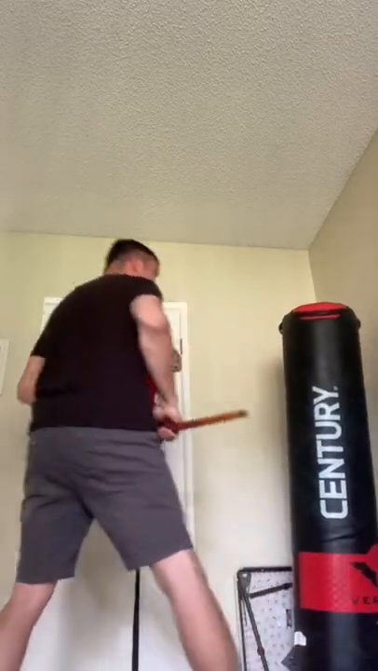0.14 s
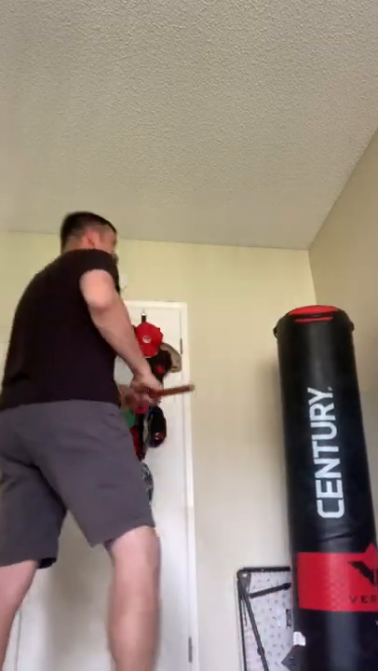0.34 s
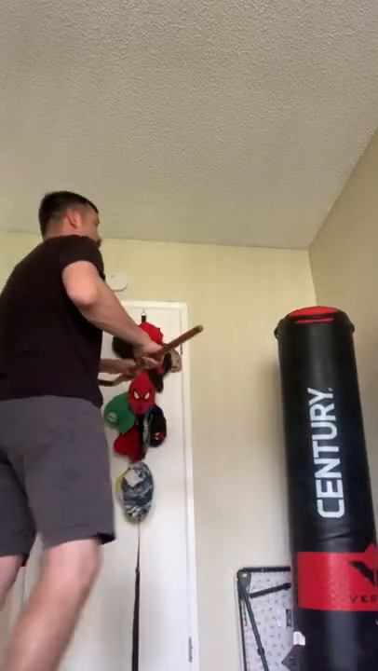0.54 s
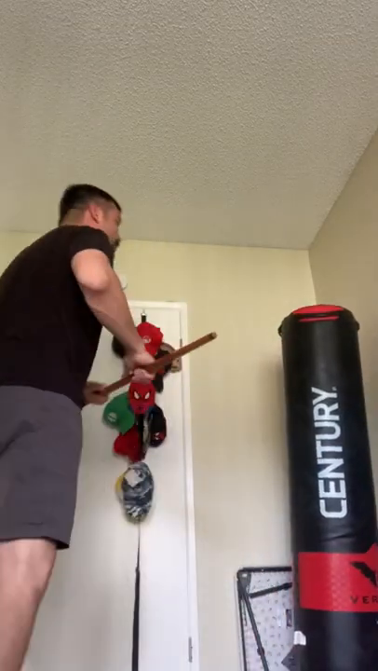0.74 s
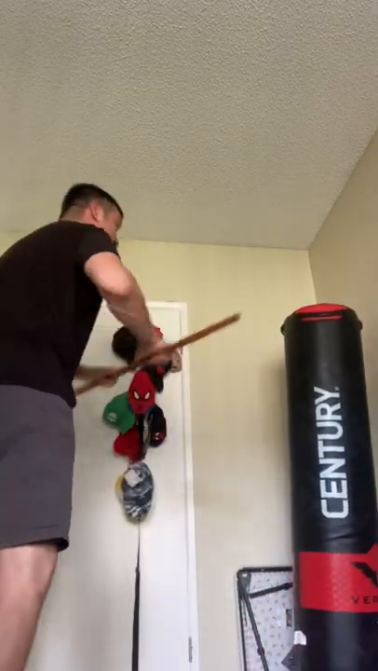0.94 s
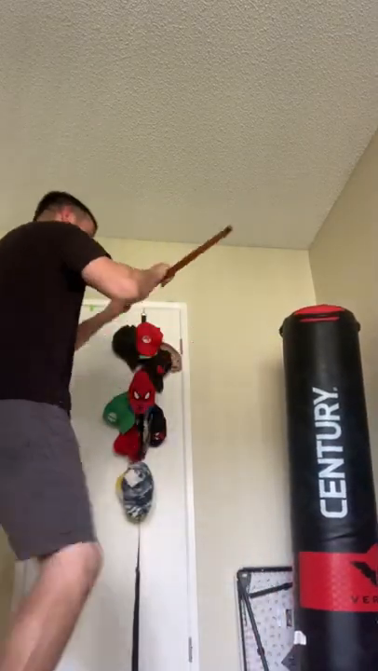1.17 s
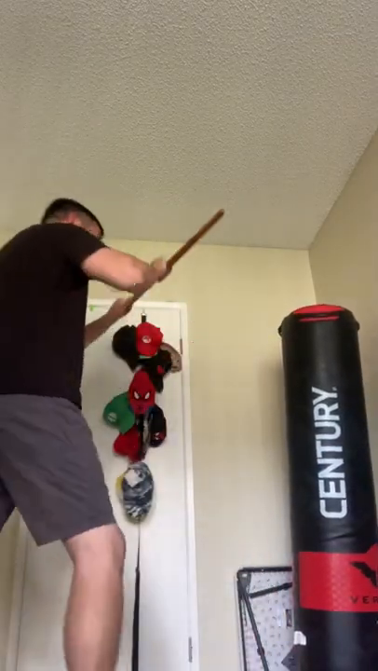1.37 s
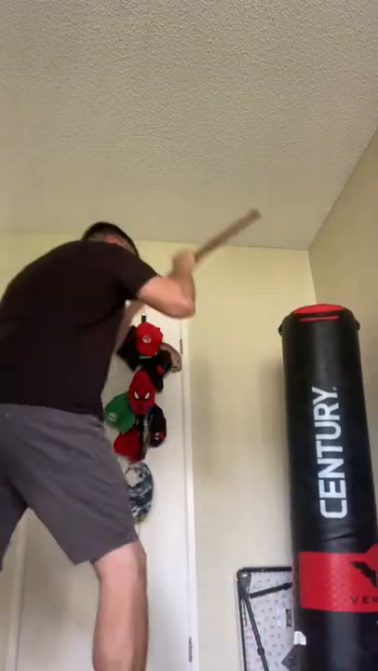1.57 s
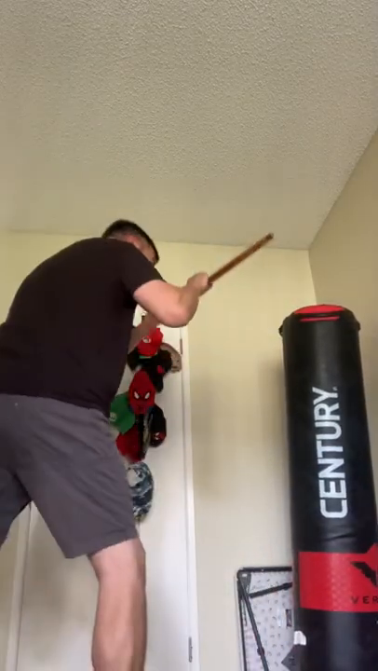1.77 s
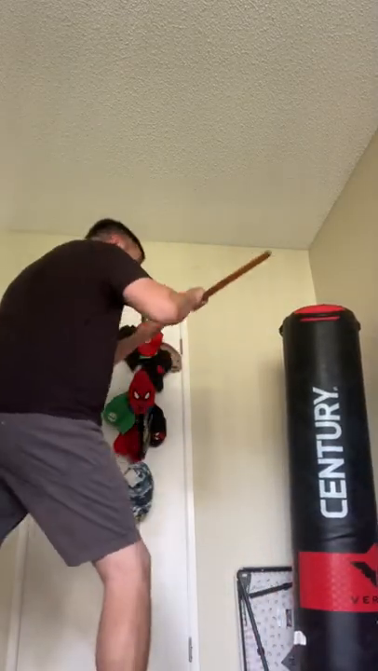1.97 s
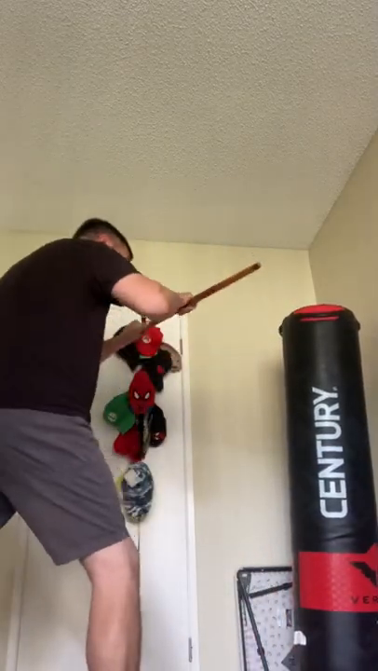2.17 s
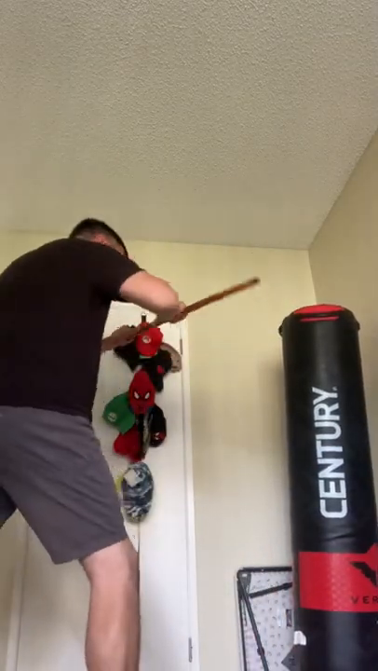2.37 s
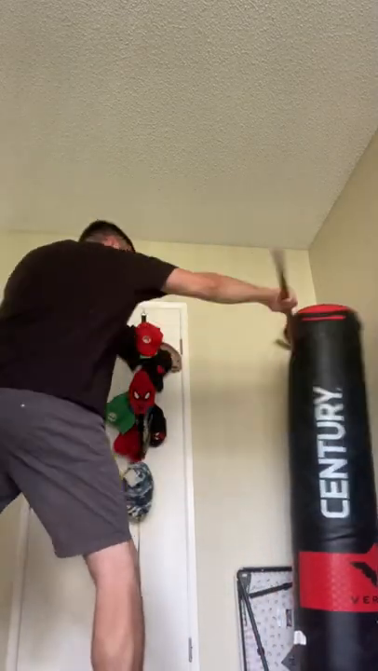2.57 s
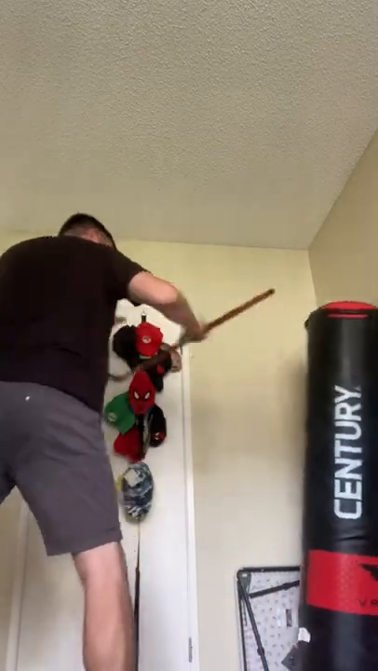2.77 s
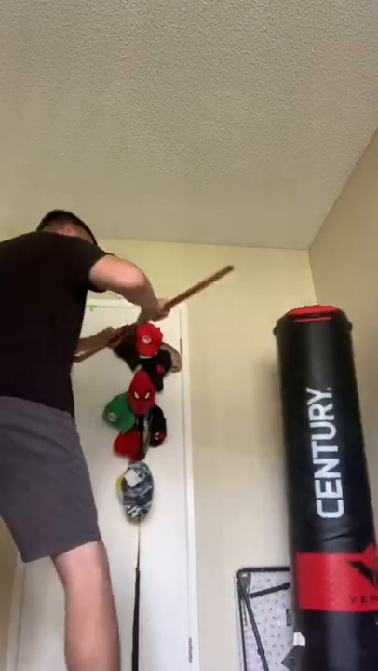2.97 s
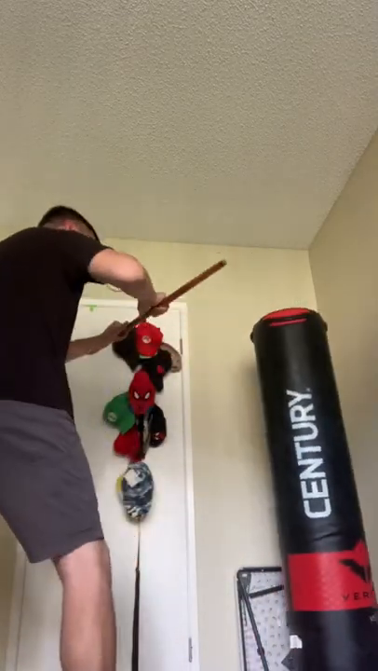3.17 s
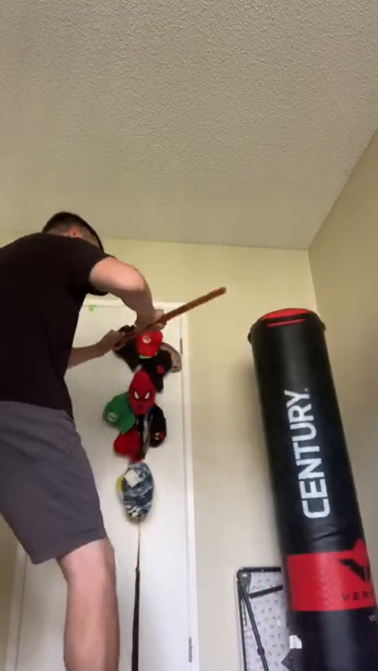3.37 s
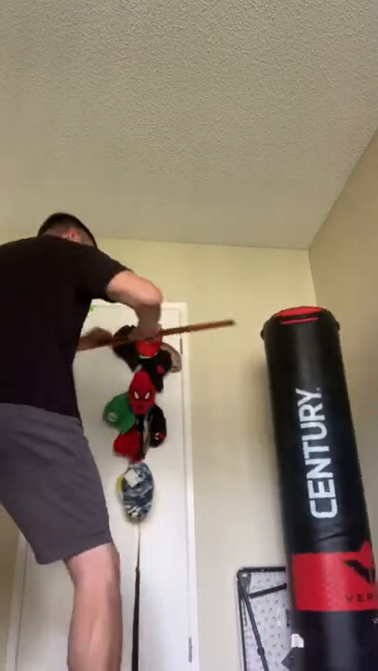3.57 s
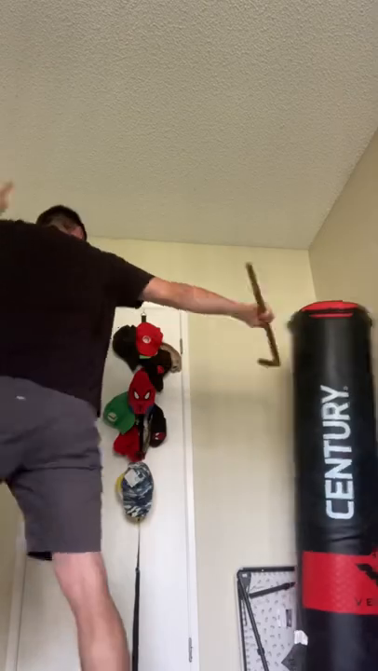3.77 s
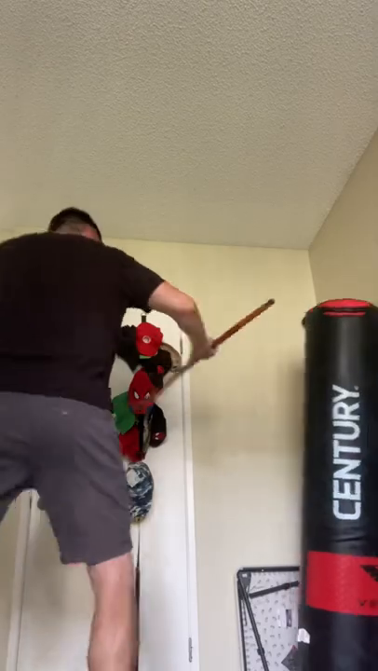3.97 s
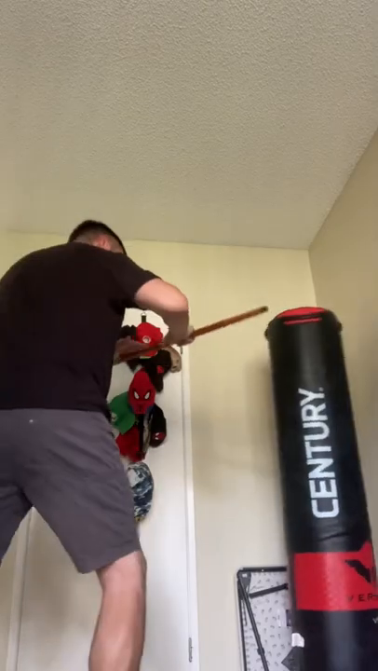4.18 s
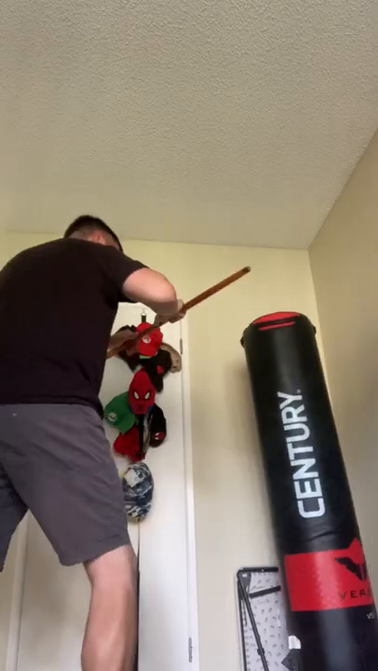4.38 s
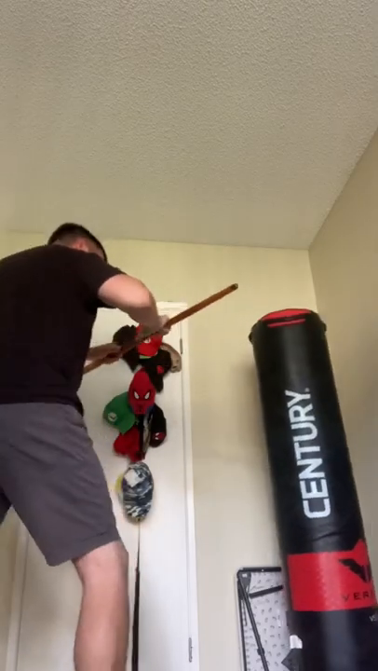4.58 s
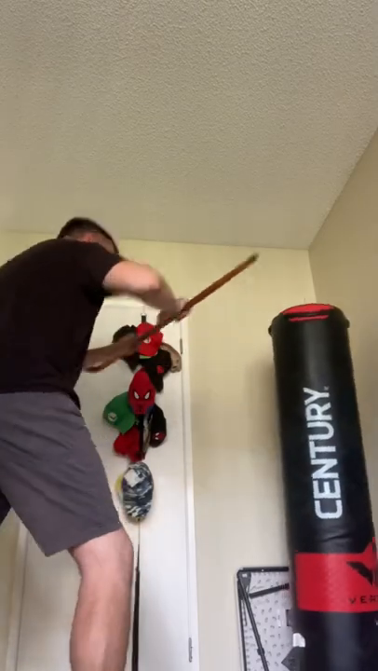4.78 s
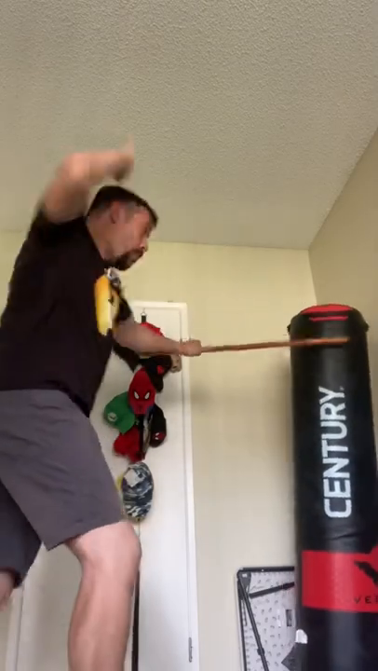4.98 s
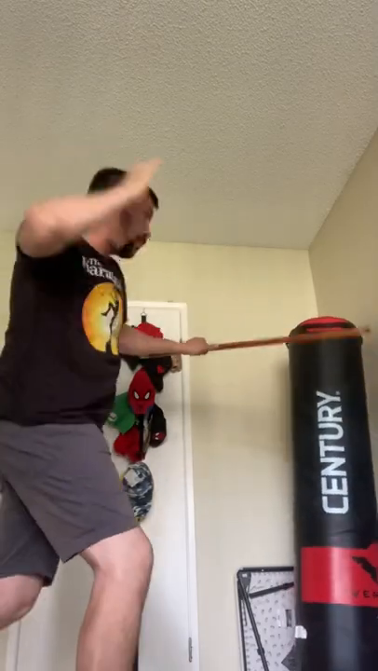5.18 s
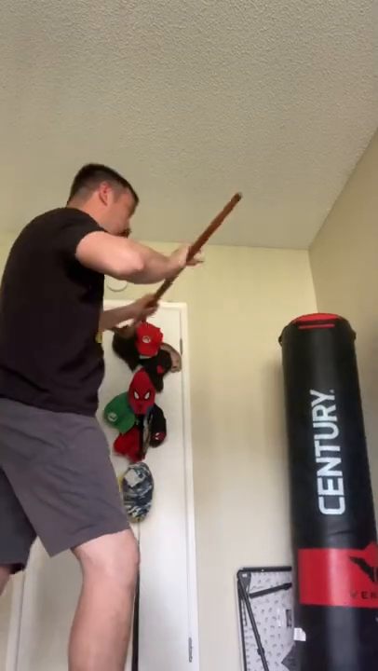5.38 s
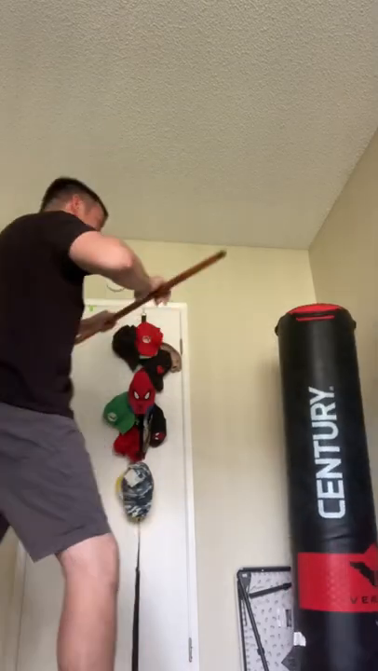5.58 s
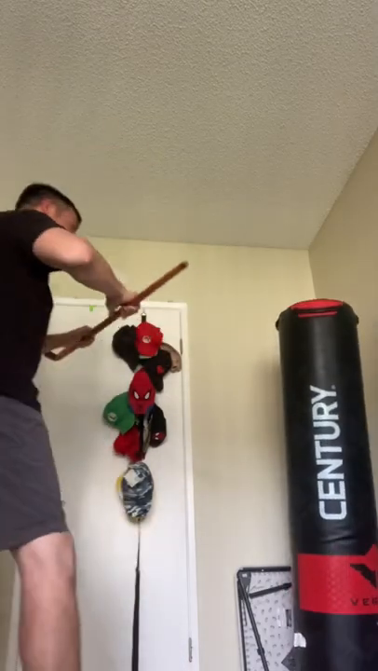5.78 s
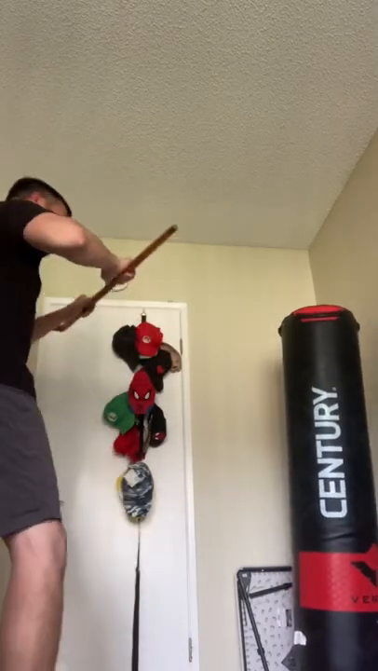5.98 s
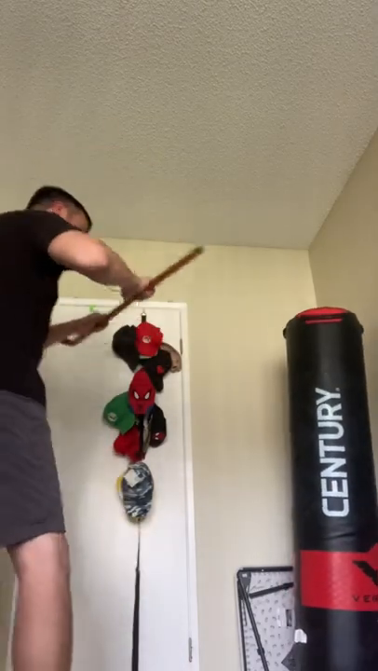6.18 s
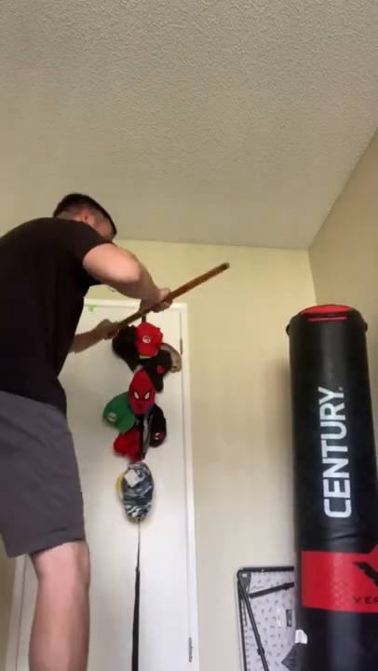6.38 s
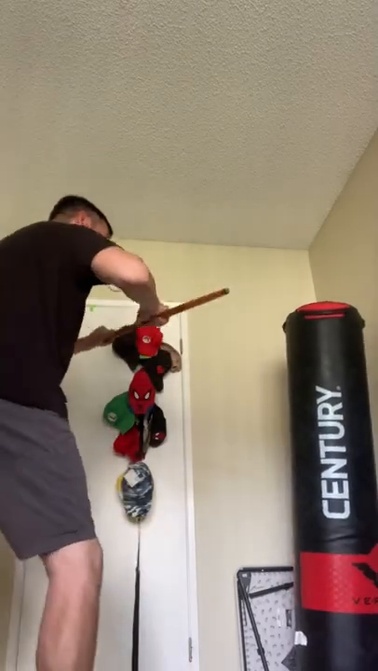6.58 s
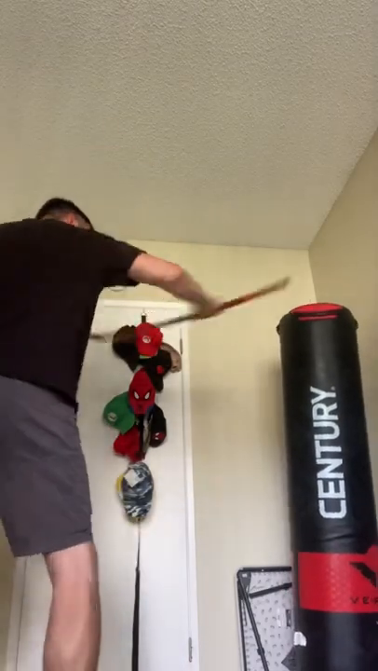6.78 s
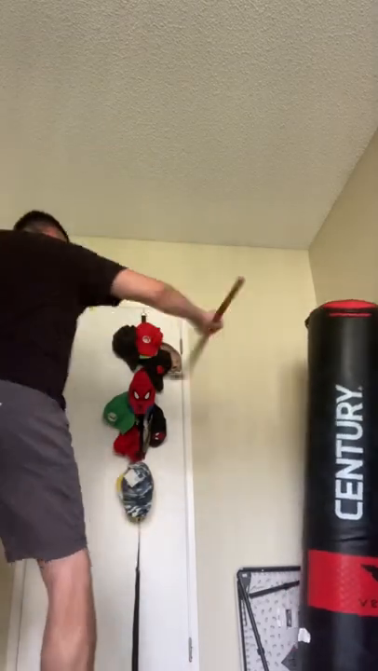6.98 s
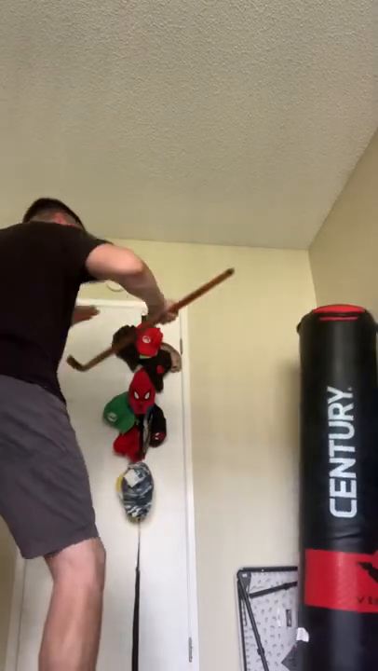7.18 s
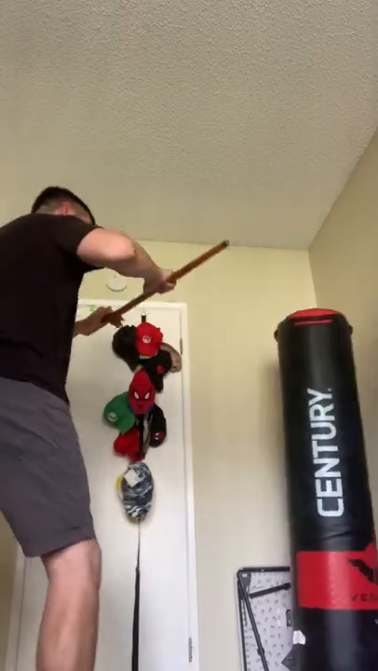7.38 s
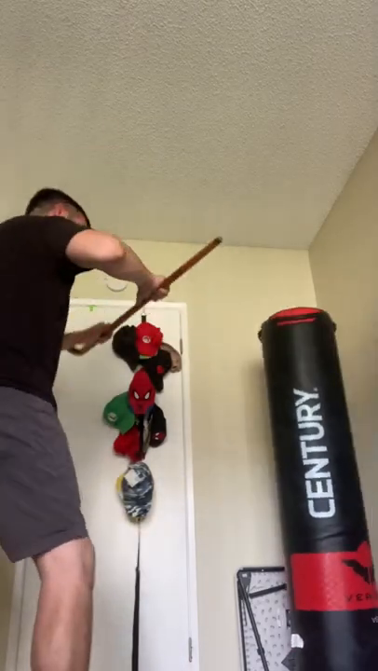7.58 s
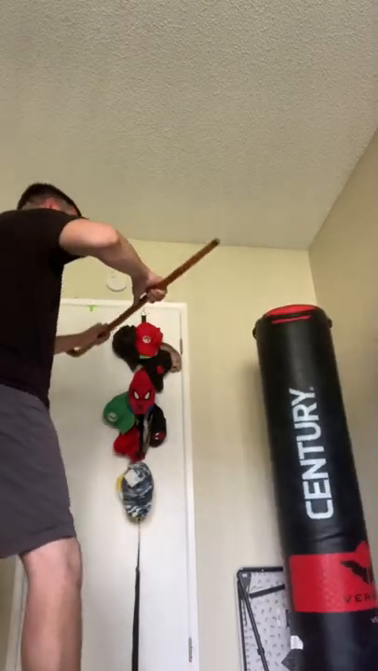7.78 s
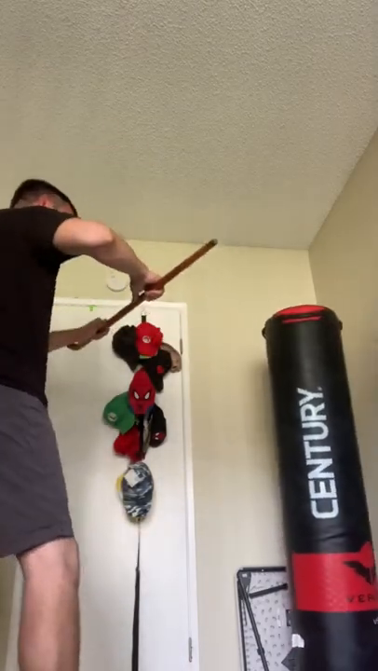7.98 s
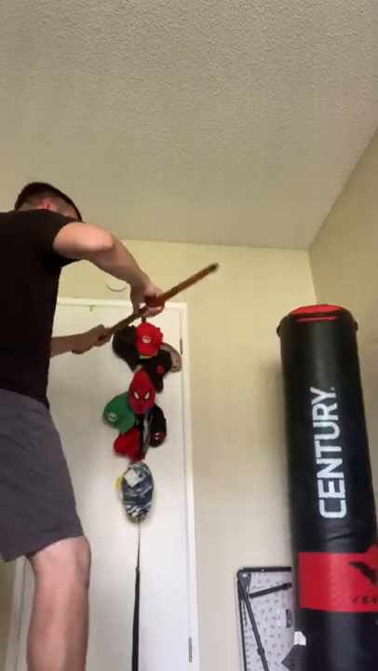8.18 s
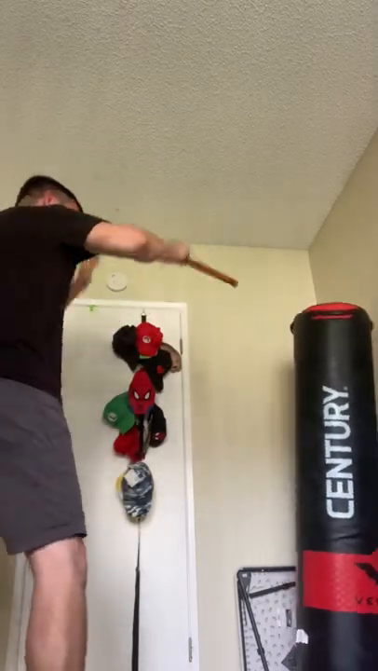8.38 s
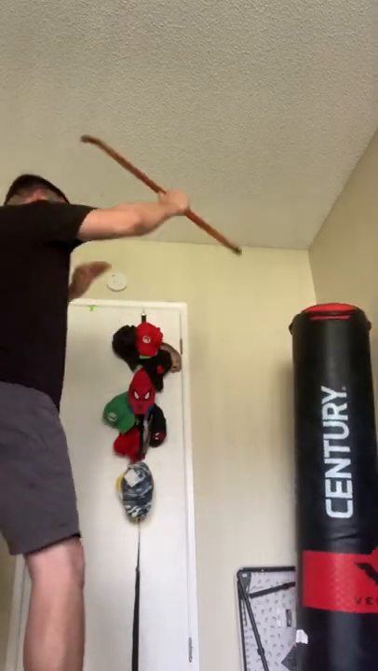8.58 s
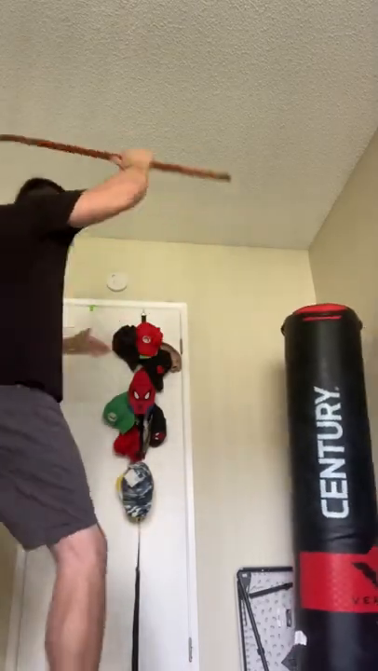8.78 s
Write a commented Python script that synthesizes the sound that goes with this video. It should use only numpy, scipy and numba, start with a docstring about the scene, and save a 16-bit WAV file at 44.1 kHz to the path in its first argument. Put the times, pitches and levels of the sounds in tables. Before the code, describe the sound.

A small, bare, live room heard through a nearby phone, with a low steady fan rush and slight motor hum throughout. From 0 to 2.5 s there is only faint handling: palms rubbing along a wooden stick near 0.2 and 0.6, a light wooden grip knock near 0.9 and a clearer one at 1.6, soft low foot thuds around 1.5 and 1.9. A brief swish, then the hardest whack at 2.6: sharp vinyl crack, padded thump, deep short boom, bright half-second echo. More blows follow at 3.75, crisper and with a stronger swish, and 4.95, duller. A palm slap and foot thud come near 5.4, another thud at 6.2. The last, weaker hit lands at 6.85. The phone's level control ducks every blow, then hiss swells in the tail. Quiet handling, a light grip at 8.25 and small slides end it.

```python
"""A small bare room, where a wooden stick whacks a padded, vinyl-covered heavy bag four times.
Noise bursts make the crack on the cover and its echoes; decaying sine waves make the bag's thump and the boom.
Around the blows, shaped noise makes gripping and sliding hands and the swish of the stick. Feet thud, a fan runs.
The phone's gain control ducks each blow and lets go while the room still rings, so a hiss swells after it."""
import sys
import numpy as np
from scipy import signal
from scipy.fft import rfft, irfft, next_fast_len
from scipy.io import wavfile
from scipy.ndimage import uniform_filter1d, minimum_filter1d
from numba import njit

SR = 44100
rng = np.random.default_rng(int(sys.argv[2]) if len(sys.argv) > 2 else 0)


def log_audio(samples):
    """Write samples as a 16-bit WAV file to the path given in sys.argv[1]."""
    # one column per channel
    frames = np.atleast_2d(samples).T
    # limit to full scale, then quantise
    limited = np.clip(frames, -1, 1)
    pcm = np.round(limited * 32767).astype(np.int16)
    wavfile.write(sys.argv[1], SR, pcm)


N = 389403  # length of the scene in samples
T = np.arange(SR) / SR  # one second of time from the start of an event


def undb(db):
    """Turn decibels into a gain."""
    return 10 ** (np.asarray(db) / 20)


def along(points, hz):
    """Read values between (Hz, value) points, spacing the frequencies as the ear does, by ratio."""
    f, value = np.transpose(points)
    return np.interp(np.log(hz + 1e-3), np.log(f), value)


def fade(t60):
    """Die away smoothly, losing 60 dB in t60 seconds."""
    return np.exp(-np.log(1000) * T / t60)


def add(out, s, sound):
    """Mix a sound in, starting at s seconds."""
    i = max(int(s * SR), 0)
    out[:, i:i + sound.shape[-1]] += sound[..., :N - i]


def wander(size, count):
    """A random line: normally distributed points, evenly spaced and joined by straight segments."""
    return np.interp(np.arange(size), np.linspace(0, size, count), rng.standard_normal(count))


# How wide the sound spreads between left and right.
# Each row: frequency in Hz, level of the side signal against the middle in dB.
WIDTH = [(120, -8), (250, -14.5), (500, -7.5), (1000, 0.5), (4500, 0.5), (6000, 4), (8000, -46),
         (12000, -35)]


def noise(colour, size=SR, peaks=()):
    """Stereo noise with a given spectrum, plus peaks or hollows; its middle signal has an rms of 1."""
    hz = np.fft.rfftfreq(size, 1 / SR)
    db = along(colour, hz)
    for peak_hz, width_hz, peak_db in peaks:
        db = db + peak_db / (1 + (2 * (hz - peak_hz) / width_hz) ** 2)
    mid, side = rfft(rng.standard_normal((2, size))) * undb(db)
    side = side * undb(along(WIDTH, hz))
    return irfft([mid + side, mid - side], size) / irfft(mid, size).std()


# How long the room's reverberation lasts.
# Each row: frequency in Hz, time to fall by 60 dB in seconds.
ROOM_T60 = [(150, 0.29), (400, 0.28), (800, 0.36), (1600, 0.4), (3500, 0.45), (8000, 0.47), (15000, 0.51)]


def die_away(x):
    """Split a one-second noise into half-octave bands and let each fade at the room's own rate."""
    centres = np.geomspace(100, 16000, 15)
    hz, spectrum = np.fft.rfftfreq(SR, 1 / SR), rfft(x)
    total = 0
    for f, share in zip(centres, np.eye(len(centres))):
        band_gain = along(np.c_[centres, share], hz)  # 1 at this centre, 0 at its neighbours
        total = total + irfft(spectrum * band_gain, SR) * fade(along(ROOM_T60, f))
    return total


def ring(modes, scatter_db, detune, spot_hz=0, spot_db=0):
    """Add fading sine waves, with random levels and tuning; those near the struck spot's pitch gain."""
    total = 0
    for hz, db, t60 in modes:
        level_chance, pitch_chance = rng.standard_normal(2)
        favour_db = spot_db * np.exp(-(5 * (spot_hz / hz - 1)) ** 2)
        gain = undb(db + scatter_db * level_chance + favour_db)
        total = total + gain * np.sin(2 * np.pi * hz * (1 + detune * pitch_chance) * T) * fade(t60)
    return total


# The fan's rush of air. Each row: frequency in Hz, level in dB per Hz (only the shape matters).
FAN_COLOUR = [(22, -23.5), (55, 2.5), (85, -3.5), (115, -15.5), (170, -6), (290, -6.5), (620, -13),
              (1200, -25), (2100, -37), (3200, -38), (4200, -41.5), (4800, -39), (7000, -50),
              (15500, -52.5)]
FAN_DB = -51  # rms of the rush's middle signal
# The hum of the fan's motor. Each row: frequency in Hz, relative level in dB.
HUM = [(59.2, -56), (118.4, -59), (285.3, -59.5), (619.1, -66), (1211, -71)]


def fan(hum_db=-2, hum_waver_db=2, drift_rad=0.82):
    """Air rushes as steady noise; the motor hums in sine waves whose level and phase waver a little."""
    t = np.arange(N) / SR
    hum = 0
    for hz, db in HUM:
        gain = np.sqrt(2) * undb(db + hum_db + hum_waver_db * wander(N, count=70))
        hum = hum + gain * np.sin(2 * np.pi * hz * t + drift_rad * wander(N, count=90))
    rush = noise(FAN_COLOUR, size=next_fast_len(N))[:, :N]
    return undb(FAN_DB) * rush + hum


# Hands shifting along the stick between attacks.
# Each row: loudest moment in seconds, time to grow that loud in seconds, level in dB.
SLIDES = [(0.195, 0.06, -59), (0.575, 0.041, -62.5), (1.19, 0.077, -66), (1.571, 0.1, -67.5),
          (4.619, .07, -67.5), (8.443, 0.052, -66), (8.792, .08, -70)]
# The sound of skin on wood. Each row: frequency in Hz, level in dB per Hz.
SLIDE_COLOUR = [(150, -25.5), (600, 0.5), (1700, 1), (2800, -4), (3400, -0.5), (6000, -7), (10000, -11),
                (15000, -19)]
# The blows on the bag, which also time the slides, the swishes and everything the bag does.
# Each row: start in seconds, force in dB, crack in dB, woody knock in dB, bass in dB,
# pitch that the struck spot favours in Hz, swish of the swing in dB.
BLOWS = [(2.583, 3.5, -0.5, 0.5, 1, 409, -57), (3.75, -1.5, 1, -2.5, 1, 278.4, -48.5),
         (4.9509, -.5, -1.5, -4, -1.5, 155.4, -52), (6.8521, -4.5, -2.5, -2.5, 0, 345, -51)]
# One slide winds up before each blow: lead in seconds, rise in seconds, level in dB.
WIND_UP_LEAD_S, WIND_UP_S, WIND_UP_DB = .13, 0.07, -66
# One takes the stick back after it: lag in seconds, rise in seconds, level in dB at a force of 0 dB.
RECOVER_LAG_S, RECOVER_S, RECOVER_DB = .48, .09, -65


def hand_slides(grain_db=2.0):
    """Palms slide along the stick in tiny slips: noise with a jittery level that swells and fades."""
    out = np.zeros((2, N))
    wind_ups = [(s - WIND_UP_LEAD_S, WIND_UP_S, WIND_UP_DB) for s, *_ in BLOWS]
    # a harder blow is followed by a louder slide
    recoveries = [(s + RECOVER_LAG_S, RECOVER_S, RECOVER_DB + force_db) for s, force_db, *_ in BLOWS]
    for s, rise_s, db in wind_ups + recoveries + list(SLIDES):
        stroke = (T / rise_s * np.exp(1 - T / rise_s)) ** 2
        slips = undb(db + grain_db * wander(SR, count=250))
        add(out, s - rise_s, slips * noise(SLIDE_COLOUR) * stroke)
    return out


# Hands catching the stick.
# Each row: start in seconds, slap of the skin in dB, knock of the wood in dB.
GRIPS = [(0.857, -83, -56.5), (1.589, -63, -48.5), (5.35, -49, -51), (8.2597, -57, -76)]
# The knock of wood in the palm. Each row: frequency in Hz, level in dB per Hz.
KNOCK_COLOUR = [(150, -26), (400, 2), (700, -2), (1270, -9), (1700, -13), (2400, -17), (6000, -38)]


def grips():
    """A palm catches the stick: skin noise and wood noise start at once and fade at the room's rate."""
    out = np.zeros((2, N))
    for s, skin_db, wood_db in GRIPS:
        skin = undb(skin_db) * noise(SLIDE_COLOUR)
        wood = undb(wood_db) * noise(KNOCK_COLOUR)
        add(out, s, die_away(skin + wood) * (1 - np.exp(-T / 0.00029)))
    return out


# Weight shifting on the floor. Each row: start in seconds, level in dB.
STEPS = [(1.48, -39), (1.56, -39), (1.93, -41), (5.385, -41), (6.2, -37)]


def footsteps():
    """Feet thud softly on the floor: three low, quickly fading sine waves with a soft start."""
    out = np.zeros((2, N))
    floor = [(56, 0, .35), (84, -2, .25), (120, -8, .2)]  # Hz, dB, seconds to fall 60 dB
    for s, db in STEPS:
        thud = ring(floor, scatter_db=1.5, detune=.02)
        add(out, s, undb(db) * thud * (1 - np.exp(-T / 0.0056)))
    return out


def swings(rise_s=.05):
    """Air swishes past the stick: noise that grows ever faster until the stick lands."""
    out = np.zeros((2, N))
    colour = [(80, -36), (400, -2), (1200, 0), (4000, -3), (9000, -9), (15000, -21)]
    for s, *_, swish_db in BLOWS:
        swell = np.exp(-T[::-1] / rise_s)
        add(out, s - 1, undb(swish_db) * noise(colour) * swell)
    return out


# Peaks and hollows that colour the slap.
# Each row: frequency in Hz, width in Hz, height in dB.
TIMBRE = [(1420, 390, -3), (1780, 250, -0.5), (2130, 69, -3.5), (2340, 120, 3.5), (2890, 130, -6.5),
          (3265, 350, 5), (3990, 150, -2.5), (5850, 250, 1.5)]


def crack(knock, snap_s=0.0011, wrap_s=0.0051, spread_s=0.0019, wrap_db=-4):
    """The stick meets the vinyl with a snap, then slaps along it as it sinks in: two short noise bursts."""
    colour = [(60, -33.5), (250, -13), (600, 1.0), (1200, -2.5), (2200, -6.5),
              (3500, -24.5), (7000, -19.5), (11000, -12.0), (15500, -18.0)]
    snap = np.exp(-T / snap_s)
    wrap = undb(wrap_db) * np.exp(-((T - wrap_s) / spread_s) ** 2)
    creases = undb(4 * wander(SR, count=5000))  # the cover's creases make the crack crackle
    return noise(colour, peaks=list(TIMBRE) + [knock]) * (snap + wrap) * creases


# The slap of the cover as the walls return it. Each row: frequency in Hz, level in dB per Hz.
SLAP = [(40, -49), (120, -13.5), (250, 7), (450, 3.5), (700, -4.5), (1100, -8), (1700, -14), (2600, -24),
        (3400, -22.5), (5000, -24), (7000, -26.5), (10500, -28.5), (15500, -36)]


def walls(crack_db, knock, early_db=2, early_s=0.046, build_s=0.001):
    """Walls return strong early sound, then a diffuse tail; a sharper crack brightens both."""
    colour = [(hz, db + crack_db * hz / (hz + 1500)) for hz, db in SLAP]
    early = 1 + undb(early_db) * np.exp(-T / early_s)
    build = 1 - np.exp(-T / build_s)
    return die_away(noise(colour, peaks=list(TIMBRE) + [knock])) * early * build


# Something light and hard in the room rings on after each blow.
# Each row: frequency in Hz, level in dB, time to fall by 60 dB in seconds.
AFTER_RING = [(1513, -1, .5), (1665, 0, .55), (1850, -3, .5), (2433, -2, .64), (2560, -5, .6),
              (2972, -5, .6), (3278, -2, .59), (3494, -3, .58), (3620, -3, .58), (4032, -6, .52),
              (5850, -2, .5)]


def after_ring():
    """Clusters of close pitches beat irregularly, so each sounds as a narrow band and not as a tone."""
    total = 0
    for hz, db, t60 in AFTER_RING:
        beats = wander(SR, count=140) + 1j * wander(SR, count=140)
        total = total + undb(db) * np.real(beats * np.exp(2j * np.pi * hz * T)) * fade(t60)
    return total


# The bag and the room ringing together.
# Each row: frequency in Hz, level in dB, time to fall by 60 dB in seconds.
RING = [(165, -3.5, 0.12), (209, -4.5, .22), (268.4, 0.5, 0.26), (310, 3.5, 0.14), (357.5, -5, 0.26),
        (453, -11, 0.11), (494, -5, 0.24), (539, -6.5, 0.27), (626, -2.5, 0.14), (754, -34.5, 0.11),
        (1104, -14.5, 0.22), (1272, -14.5, 0.23), (1587, -16, 0.28), (1590, -25.5, 0.21)]


def bag_ring(spot_hz, body_s=0.0096):
    """The struck bag rings in fading sine waves; those near the pitch of the struck spot are raised."""
    modes = ring(RING, scatter_db=1.5, detune=.005, spot_hz=spot_hz, spot_db=7)
    return modes * (1 - np.exp(-T / body_s))


# The low standing waves of the room.
# Each row: frequency in Hz, level in dB, time to fall by 60 dB in seconds.
BOOM = [(48.5, -9, .32), (64.5, 0, .2), (84.7, 1, .155), (102, 1, .11), (122, -4, .12), (141, -19, .27),
        (180, -20, .27)]


def room_boom(push_s=0.024):
    """The giving padding pushes the room's standing waves; the minus sign is the dent drawing air in first."""
    return -ring(BOOM, scatter_db=.3, detune=.002) * (1 - np.exp(-T / push_s))


# Gains of what every blow sets off, before the settings of each blow are added.
CRACK_DB, WALLS_DB, BODY_DB, BOOM_DB, AFTER_DB = 12, 11, 12, 26, -23.5
BODY_LAG_S, SINK_S = 0.00498, .01262  # from contact to the bag's ring and to the boom


def bag(knock_hz=1600, knock_width_hz=1500):
    """Each blow cracks and slaps at once; the bag's ring comes next, then the boom as the padding gives way."""
    out = np.zeros((2, N))
    for s, force_db, crack_db, knock_db, bass_db, spot_hz, _ in BLOWS:
        knock = (knock_hz, knock_width_hz, knock_db)
        after = np.array([after_ring(), after_ring()])  # left and right beat separately
        add(out, s, undb(force_db + crack_db + CRACK_DB) * crack(knock))
        add(out, s, undb(force_db + WALLS_DB) * walls(crack_db, knock))
        add(out, s, undb(force_db + AFTER_DB) * after)
        add(out, s + BODY_LAG_S, undb(force_db + BODY_DB) * bag_ring(spot_hz))
        add(out, s + SINK_S, undb(force_db + bass_db + BOOM_DB) * room_boom())
    return out


def scene(left_db=-0.83):
    """Everything in the room, with the left side left_db against the right, so a little softer."""
    everything = fan() + hand_slides() + grips() + footsteps() + swings() + bag()
    return everything * undb(np.array([[left_db], [-left_db]]) / 2)


@njit
def let_go(cut, release, ease):
    """Follow a rising gain cut at once; let it go through two slow stages."""
    out, first, second = np.empty(len(cut)), 0., 0.
    for i in range(len(cut)):
        first = max(cut[i], first * (1 - release))
        second = max(first, second + (first - second) * ease)
        out[i] = second
    return out


def gain_control(x, limit_db=-6.5, sense_s=0.0042, hold_s=0.037, release_s=0.04, ease_s=0.056):
    """Turn down by whatever the short-term power exceeds the limit, hold that, then recover."""
    power = uniform_filter1d(np.mean(x ** 2, axis=0), int(sense_s * SR))
    excess_db = np.maximum(10 * np.log10(np.abs(power) + 1e-12) - limit_db, 0)
    half = int(hold_s * SR / 2)
    # the two minus signs make the minimum a maximum, here over the recent past
    held_db = -minimum_filter1d(-excess_db, 2 * half + 1, origin=half)
    cut_db = let_go(held_db, 1 / (release_s * SR), 1 / (ease_s * SR))
    return x * undb(-cut_db)


def record(dry):
    """The phone ducks the blows, sheds the deepest bass, rounds the remaining peaks and cuts the top."""
    bass_cut = signal.butter(3, 34, "highpass", fs=SR, output="sos")
    x = signal.sosfilt(bass_cut, gain_control(dry))
    x = x / (1 + (x / .88) ** 6) ** (1 / 6)  # peaks bend towards 0.88 of full scale
    top_cut = signal.ellip(8, .2, 70, 15800, fs=SR, output="sos")  # steep low-pass at 15800 Hz
    return signal.sosfilt(top_cut, x)


dry = scene()
out = record(dry)
log_audio(out)
```